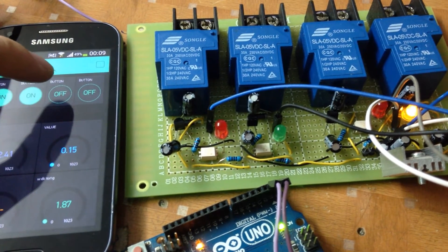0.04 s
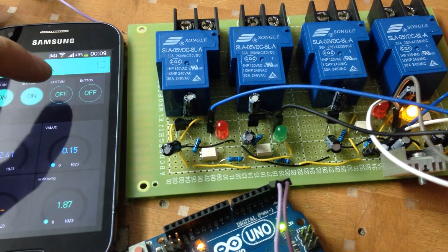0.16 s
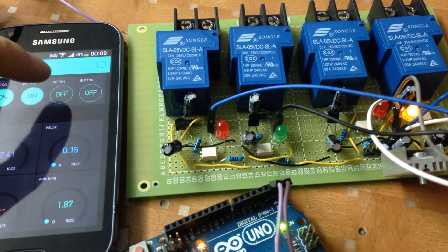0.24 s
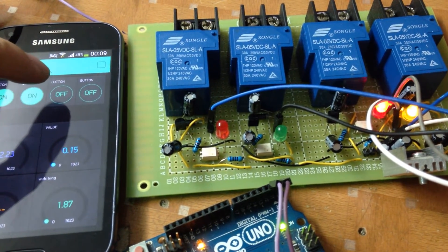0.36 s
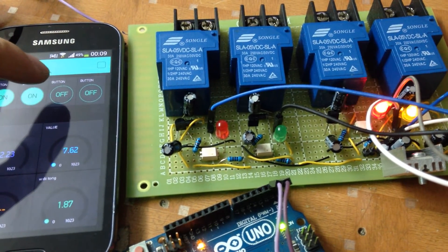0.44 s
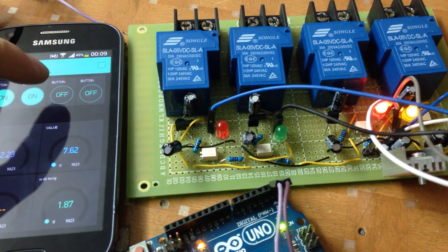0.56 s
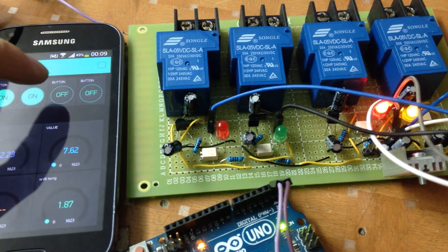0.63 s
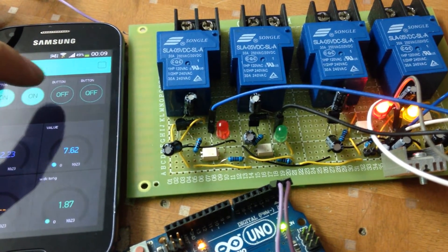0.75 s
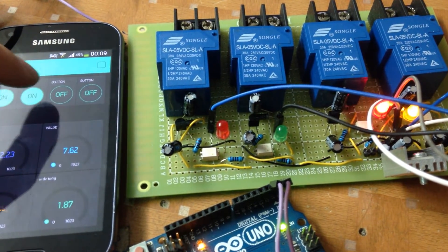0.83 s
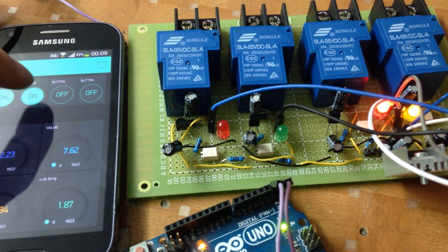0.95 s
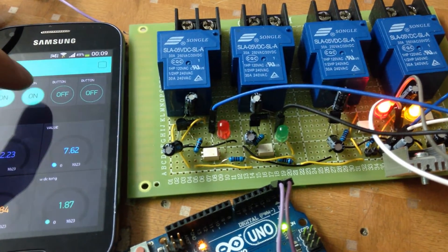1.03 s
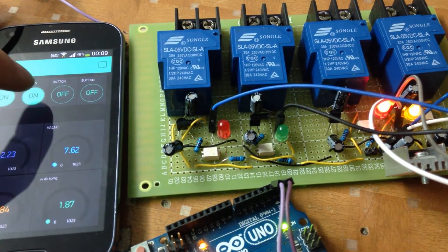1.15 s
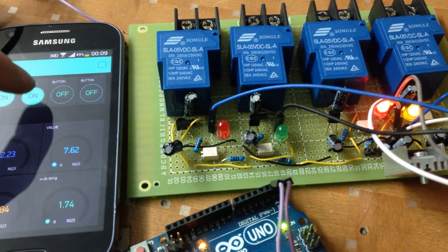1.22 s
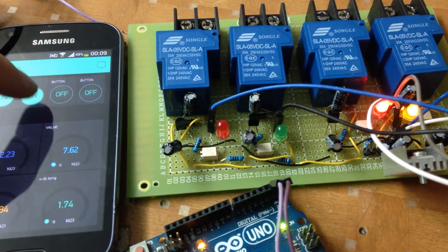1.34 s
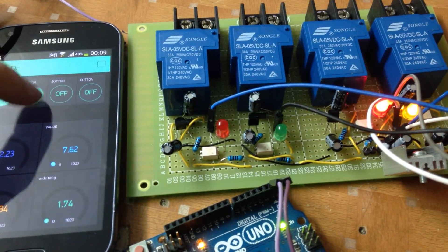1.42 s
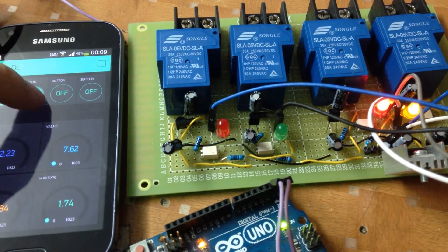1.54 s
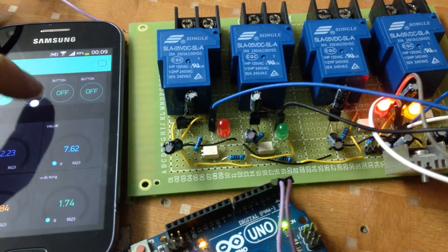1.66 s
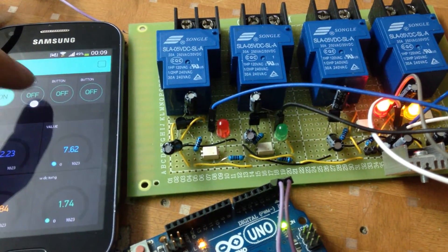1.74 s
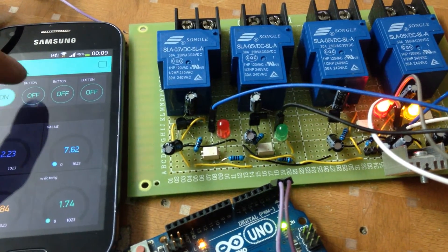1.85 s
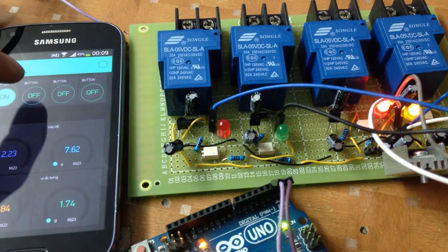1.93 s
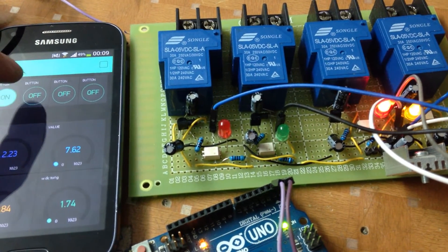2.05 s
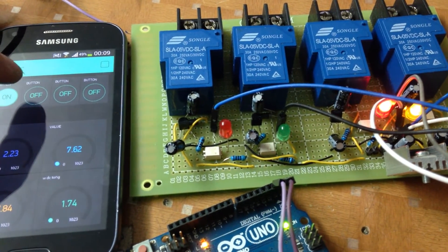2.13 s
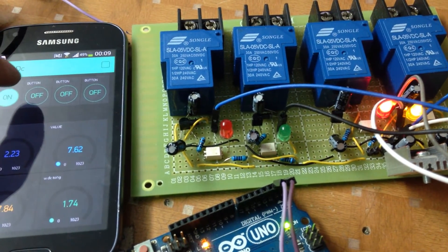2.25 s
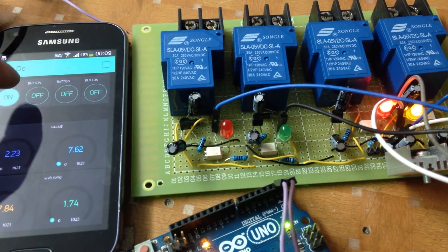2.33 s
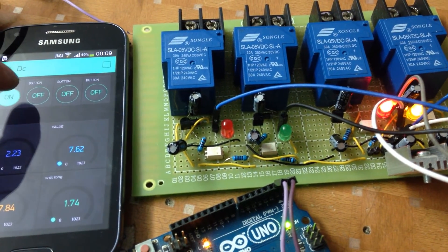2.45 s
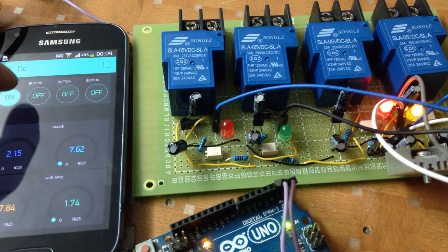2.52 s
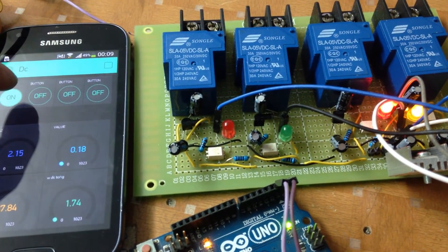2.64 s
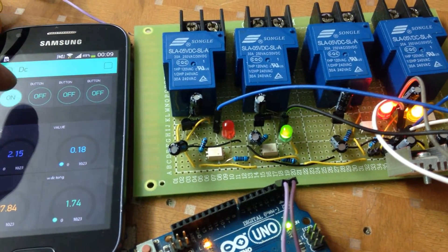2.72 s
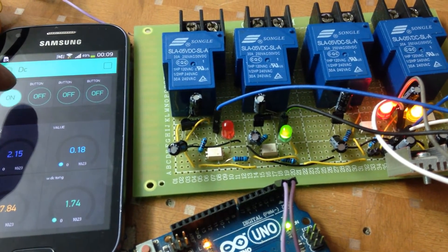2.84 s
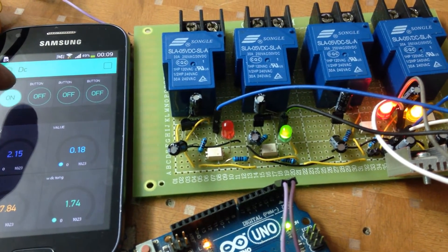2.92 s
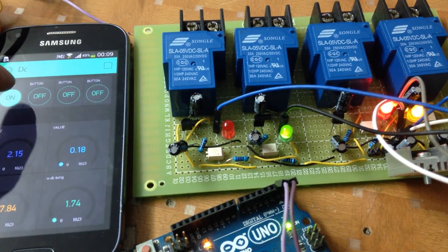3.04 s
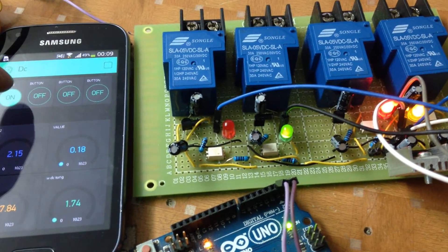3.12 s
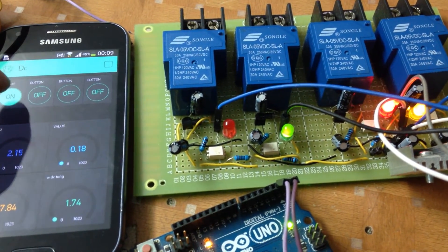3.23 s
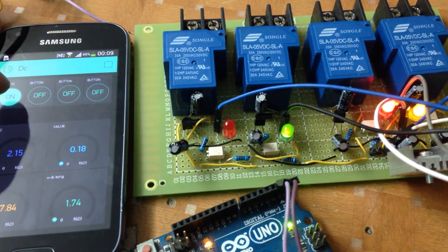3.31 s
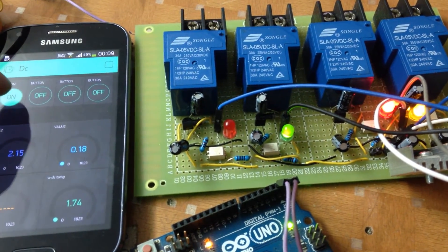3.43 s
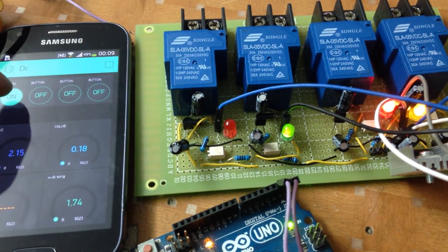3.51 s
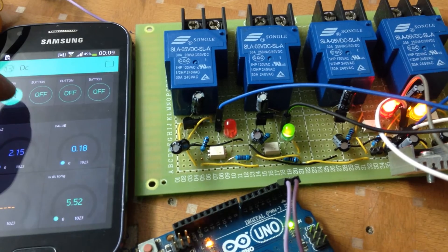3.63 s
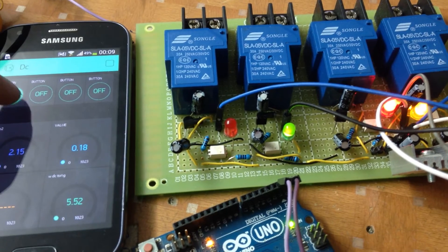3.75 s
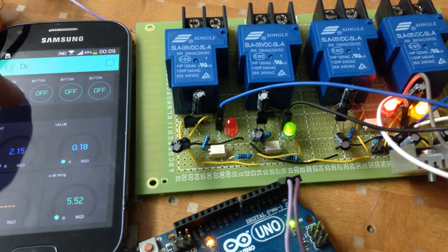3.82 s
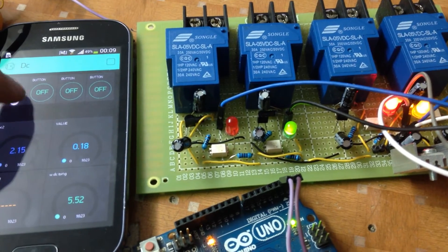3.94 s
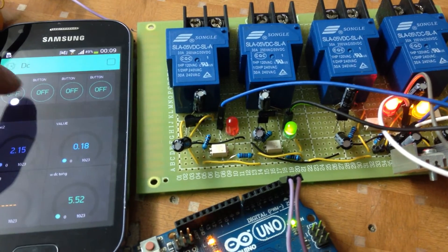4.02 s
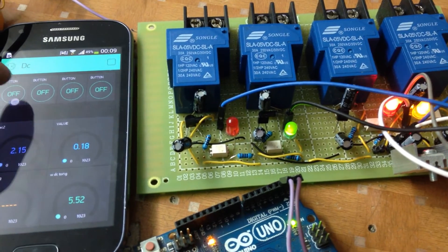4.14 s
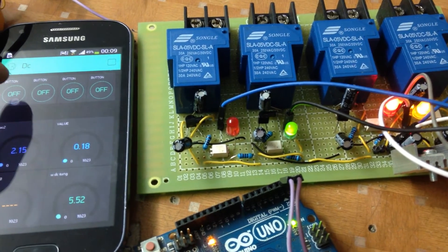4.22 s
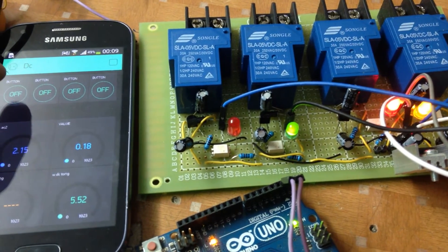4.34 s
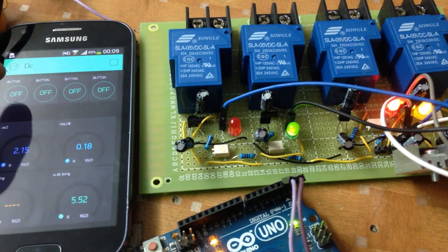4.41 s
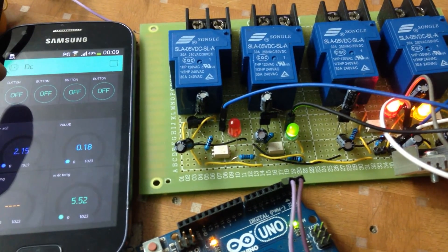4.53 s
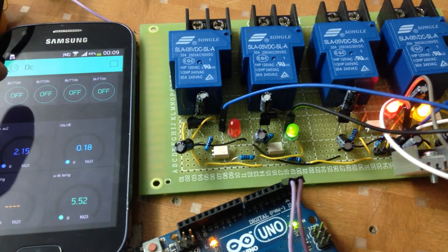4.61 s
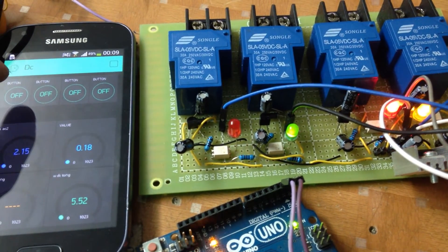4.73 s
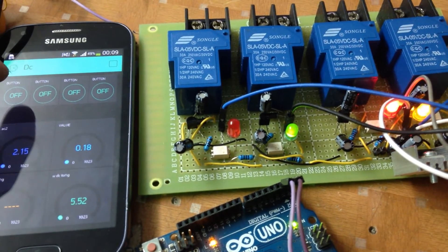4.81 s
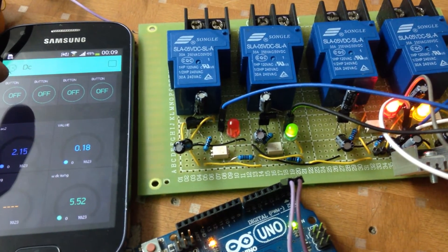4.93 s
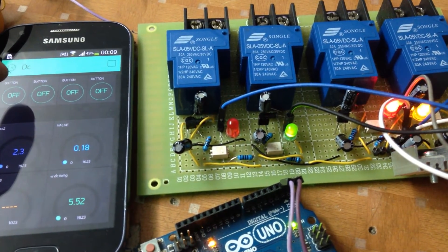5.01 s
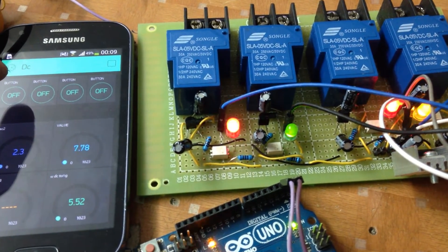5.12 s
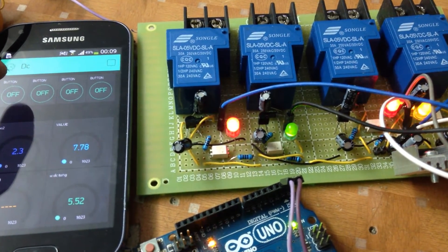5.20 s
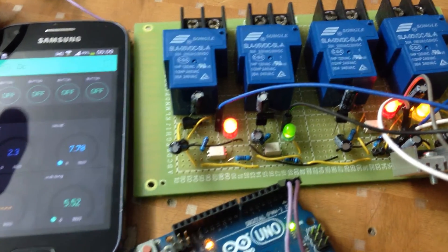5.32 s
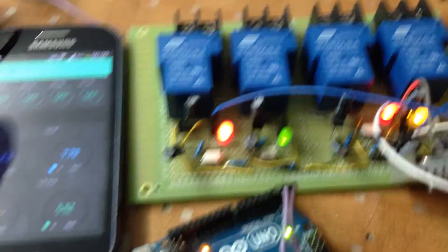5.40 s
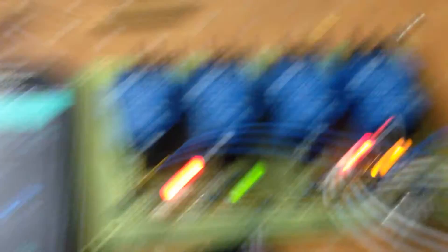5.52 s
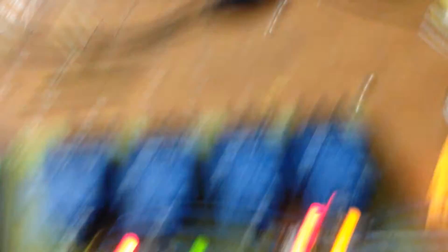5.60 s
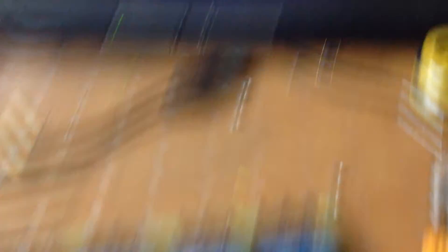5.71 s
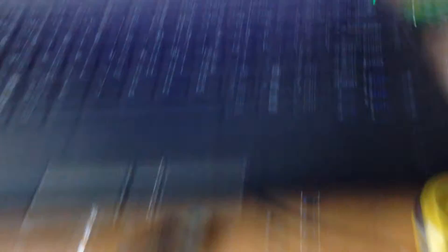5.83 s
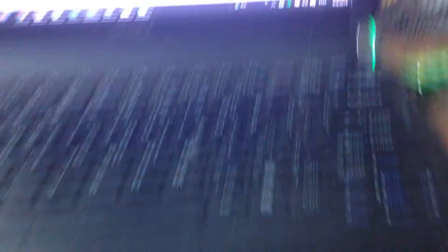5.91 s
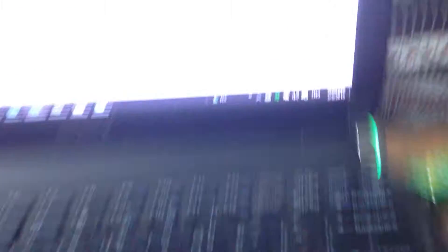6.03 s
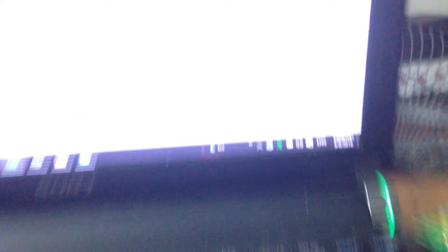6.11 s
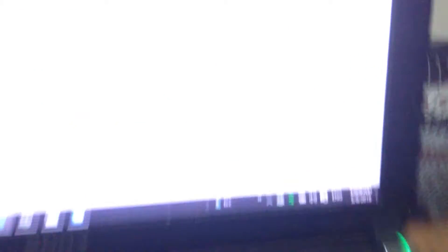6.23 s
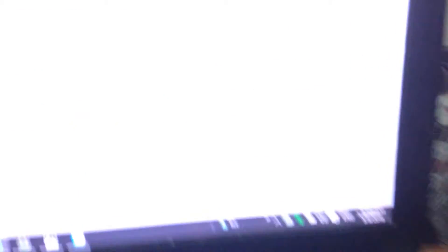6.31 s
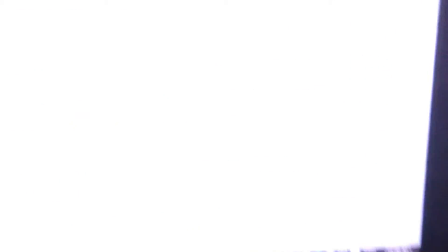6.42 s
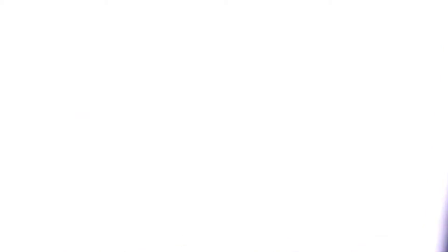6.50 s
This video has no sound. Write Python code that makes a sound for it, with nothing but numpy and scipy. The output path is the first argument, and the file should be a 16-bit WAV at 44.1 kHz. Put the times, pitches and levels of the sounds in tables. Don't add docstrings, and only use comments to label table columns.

```python
import sys
import numpy as np
from scipy import signal
from scipy.fft import rfft, irfft
from scipy.io import wavfile
from scipy.ndimage import uniform_filter1d, minimum_filter1d

SR = 44100
rng = np.random.default_rng(int(sys.argv[2]) if len(sys.argv) > 2 else 0)


def nominal_scale(level):
    x = np.asarray(level, float) / 20
    return 10 ** x


def file_out(sig):
    cols = np.atleast_2d(sig).T
    lim = np.clip(cols, -1, 1)
    pcm = np.round(lim * 32767).astype(np.int16)
    wavfile.write(sys.argv[1], SR, pcm)


N = 289296

# time_s, shaft_hz
FAN_SPEED = [
    (0, 63.205),
    (3.1, 63.205),
    (3.6, 63.24),
    (6.56, 63.24),
]
# shaft_multiple, level_db, fuzz_share
FAN_ORDERS = [(1, -70, 0.85), (2, -63.5, 0.04), (4, -70.5, 0.6), (5, -66, 1), (6, -65, 0.4),
              (7, -68.5, 0.95), (8, -81, 0.4), (9, -68.5, 0.7), (13.5, -68.5, 0.94)]
# pitch_hz, first_throb_s
TRANSFORMER_TONES = [(168.58, .0059), (180.0, .011), (204.93, .0395), (99.6, .003), (232.5, .01)]
TRANSFORMER_DB = [-60.5, -72, -64, -87, -72]
# freq_hz, density_db
AIR_SPECTRUM = [(22, -31), (50, -19), (160, -13.5), (300, -19.5), (450, -19), (720, -22), (870, -18),
                (1000, -20.5), (1750, -16), (2700, -22), (5000, -20.5), (8500, -20.5), (12000, -24.5),
                (15500, -34)]
# time_s, place
MIC_SWAY = [(0, .8), (.4, .4), (.8, -.2), (1.5, .5), (1.85, 0), (2.2, .8), (2.55, .8), (2.8, -.2),
            (3.1, -1.9), (3.5, -.3), (3.95, -1.4), (4.3, .4), (4.6, -.8), (4.9, .1), (5.5, -.9), (5.8, .5),
            (6.2, .3), (6.56, .6)]
# time_s, grip_0_to_1
HAND_GRIP = [
    (0, .35),
    (.4, .8),
    (.6, .05),
    (1.2, 0.2),
    (1.7, 0.55),
    (3.5, 1),
    (5.4, 0.86),
    (5.9, 0.55),
    (6.56, .25),
]
# start_s, pitch_hz, level_db, t60_s
DESK_KNOCKS = [
    (.015, 427, -48, 0.33),
    (.03, 305, -47, .35),
    (0.059, 385, -42, 0.15),
    (3.5, 376, -50, 0.35),
]
# start_s, length_s, level_db
COIL_PULLS = [
    (.4540, 0.001, -41),
    (2.7698, 0.002, -37),
    (5.0975, 0.001, -39),
]
# time_s, blow_db
ARMATURE_BLOWS = [
    [(.4659, -16), (.4663, -10), (.4667, -5), (.4676, -14), (.4690, -14), (.4707, -9)],
    [(2.7830, -14), (2.7833, -9), (2.7836, -5), (2.7845, -10), (2.7858, -14), (2.7865, -14), (2.7884, -20)],
    [(5.1100, -14), (5.1105, -10), (5.1109, -10), (5.1113, -6), (5.1124, -9), (5.1137, -11), (5.1150, -17)],
]
SEATED_TIMES = [.4692, 2.7866, 5.1124]
# pitch_hz, peak_db, build_up_s, fade_db_per_ms
CASE_ONE = [(3720, -38, .0006, 9), (4300, -36, .0007, 8), (4740, -23, .0033, 3), (5300, -27, .0007, 7),
            (5800, -21, .0007, 8), (6200, -19, .0007, 6), (6500, -21, .0007, 8), (6850, -17, .0008, 2.5),
            (8050, -17.5, .0007, 4.5), (8770, -13, .0008, 5.5), (10088, -8.5, .0023, 2.5),
            (11246, -20, .002, 3.5), (10650, -25, .0008, 6), (12000, -26, .0008, 7), (12726, -19, .0012, 6),
            (13100, -27, .0007, 8), (13550, -22, .0007, 8), (14433, -20, .0006, 6), (15980, -30, .0008, 8)]
# pitch_hz, peak_db, build_up_s, fade_db_per_ms
CASE_TWO = [(2266, -42, .001, 1.2), (3200, -33, .0006, 4), (4000, -36, .0007, 2.5), (4667, -32, .002, 1.5),
            (5130, -31, .0014, 3), (5599, -28, .0014, 3), (6788, -15, .0005, 8), (7100, -18, .0005, 7),
            (7499, -14, .0005, 6), (7850, -19, .0005, 6), (8387, -11, .0012, 2.2), (9453, -14, .001, 1.5),
            (9846, -14, .0008, 3.5), (10400, -20, .0005, 8), (11052, -19, .0005, 7), (11827, -23, .0005, 7),
            (12737, -23, .001, 6), (13500, -25, .0005, 6), (14072, -23, .0005, 6), (14550, -26, .0005, 7)]
# pitch_hz, peak_db, build_up_s, fade_db_per_ms
CASE_THREE = [(2692, -43, .001, 3), (3688, -33, .0008, 4), (4075, -35, .0012, 3), (4650, -20, .0012, 5),
              (5400, -28.5, .0006, 6), (5900, -30, .0006, 6), (7150, -19, .0008, 7), (7709, -8.5, .0014, 4),
              (8446, -20, .0012, 3), (9141, -23, .0006, 2.2), (9803, -15, .001, 4), (10654, -16, .0014, 6),
              (11400, -19, .0013, 7), (11897, -15, .0013, 7), (12500, -19, .0015, 7), (13168, -20, .001, 5),
              (13700, -22, .0008, 7), (14287, -19, .0005, 8), (15830, -32, .001, 7)]
# pitch_hz, width_hz, level_db, t60_s
SPRING_RINGS = [
    [(4700, 200, -33, 0.2), (6100, 300, -33, 0.097), (7440, 900, -35, 0.11), (8800, 1200, -33, .1),
     (10070, 800, -33, 0.15), (11200, 200, -37, 0.14), (12200, 400, -38, 0.1), (12900, 400, -36, .1),
     (14500, 700, -44, .1)],
    [(4640, 210, -37, 0.12), (5900, 2300, -28.5, 0.087), (8420, 700, -30.5, 0.2), (9900, 1100, -35, .15),
     (11500, 500, -38, 0.15), (12300, 500, -36, .12), (14000, 600, -46, .09)],
    [(4620, 280, -32, 0.11), (7650, 600, -32, .15), (8900, 600, -30, 0.14), (10107, 1100, -35, 0.17),
     (11800, 800, -35, .15), (12800, 400, -34, 0.16), (14700, 700, -43, .1)],
]
# freq_hz, level_db
CONTACT_CRACK = [
    [(500, -50), (1500, -38), (2500, -33), (3500, -35), (6000, -16), (10000, -14), (14000, -19),
     (15300, -30), (16500, -20)],
    [(500, -66), (1500, -62), (2800, -54), (3300, -38), (6000, -24), (10000, -15), (14500, -21),
     (15300, -44), (16500, -60)],
    [(500, -56), (1500, -39), (2800, -34), (3500, -33), (6000, -20), (10000, -14), (13000, -16),
     (15500, -30), (16500, -26)],
]
# freq_hz, t60_s
DESK_TAIL = [(2000, 0.069), (5000, 0.32), (9000, 0.25), (15000, 0.34)]
# start_s, length_s, swaps_per_s
HISS_SWAPS = [
    (.1, .1, 10),
    (.9, .1, 10),
    (1.36, .4, 30),
    (2.2, .46, 11),
    (3.08, .6, 12),
    (4.29, .55, 20),
    (5.68, .76, 7),
]


def evened(x):
    return x / np.sqrt(np.mean(x ** 2) + 1e-20)


def read(points, hz):
    f, value = np.transpose(points)
    return np.interp(np.log(hz + 1), np.log(f + 1), value)


def track(points, t):
    return np.interp(t, *np.transpose(points))


def resonate(x, hz, width_hz):
    turn = np.exp(2j * np.pi * np.cumsum(hz * np.ones(len(x))) / SR)
    r = np.exp(-np.pi * width_hz / SR)
    return 2 * (turn * signal.lfilter([1 - r], [1, -r], x / turn)).real


def causal(points, size=256):
    log_gain = np.log(nominal_scale(read(points, abs(np.fft.fftfreq(2048, 1 / SR)))))
    return np.fft.ifft(np.exp(np.conj(signal.hilbert(log_gain)))).real[:size]


def bump(hz, mid_hz, octaves):
    return np.exp(-.5 * (np.log2((hz + 1) / mid_hz) / octaves) ** 2)[:, None]


def turned(t):
    start_s, length_s = 5.3, 0.83
    return np.clip((t - start_s) / length_s, 0, 1)


def hum():
    main_hz, blade_throb_s = 199.11, .0169
    t = np.arange(N) / SR
    shaft_hz = track(FAN_SPEED, t)
    turns, main = np.cumsum(shaft_hz) / SR, rng.random()
    sway, grip = track(MIC_SWAY, t), track(HAND_GRIP, t)
    blade_db, main_db = -57 + 4.5 * sway, -54 - 2 * sway
    low_db, high_db = -8 + 9 * grip, -4.5 + 5.5 * grip

    out = nominal_scale(main_db) * np.sin(2 * np.pi * (main_hz * t + main))
    blade_start = main + (main_hz - 3 * shaft_hz[0]) * blade_throb_s
    out += nominal_scale(blade_db) * np.sin(2 * np.pi * (3 * turns + blade_start))
    for (hz, throb_s), db in zip(TRANSFORMER_TONES, TRANSFORMER_DB):
        phase = hz * t + main + (main_hz - hz) * throb_s
        out += nominal_scale(db + high_db) * np.sin(2 * np.pi * phase)
    for k, db, fuzz in FAN_ORDERS:
        clean = np.sin(2 * np.pi * (k * turns + rng.random()))
        width_hz = .12 * k ** 2 + 1
        fuzzy = evened(resonate(rng.standard_normal(N), k * shaft_hz, width_hz)) / np.sqrt(2)
        order_db = db + (low_db if k < 3 else high_db)
        out += nominal_scale(order_db) * (np.sqrt(1 - fuzz) * clean + np.sqrt(fuzz) * fuzzy)
    return np.sqrt(2) * out


def air():
    frames, hz = N // 256 + 5, np.fft.rfftfreq(1024, 1 / SR)
    a, b, patches = rng.standard_normal((frames, 513, 3)).T
    noise = a + 1j * b
    patches = evened(uniform_filter1d(uniform_filter1d(patches, size=12, axis=0), size=14, axis=1))
    t = np.arange(frames) * 256 / SR
    grip, turn = track(HAND_GRIP, t), turned(t)

    field_db = read(AIR_SPECTRUM, hz)[:, None] + 1.24 * patches
    plain = signal.istft(noise * nominal_scale(field_db), nperseg=1024, noverlap=768)[1]
    level = np.sqrt(np.mean(plain ** 2))

    hiss_db = -46.5 + 1.5 * turn
    rumble_db = -16.5 + 20 * grip
    stir_db = 8.5 * np.exp(-(t / .19) ** 2)
    mids_db = -0.1 + 2 * grip - 1.5 * turn + stir_db
    outlet_db = -0.54 + 1.1 * turn
    facing_db = 2.5 * np.clip((t - 6.2) / .15, 0, 1)
    field_db = field_db + hiss_db + rumble_db * bump(hz, 80, 0.62)
    field_db = field_db + mids_db * bump(hz, 370, 0.61) + outlet_db * bump(hz, 1200, 0.081)
    field_db = field_db + facing_db * (bump(hz, 1430, .12) - bump(hz, 2100, .2))
    return signal.istft(noise * nominal_scale(field_db), nperseg=1024, noverlap=768)[1][:N] / level


def knock():
    out = np.zeros(N)
    for start_s, hz, db, t60 in DESK_KNOCKS:
        t = np.maximum(np.arange(N) / SR - start_s, 0)
        out += nominal_scale(db - 60 * t / t60) * (1 - np.exp(-t / 0.0065)) * np.sin(2 * np.pi * hz * t)
    return out


def case_modes(case, t):
    out = np.zeros(len(t))
    for k, (hz, db, rise_s, fade) in enumerate(case):
        level_db = 5 + db - fade * np.maximum(1000 * (t - rise_s), 0)
        rise = np.minimum(t / max(rise_s, 1e-4), 1)
        out += nominal_scale(level_db) * rise * np.sin(2 * np.pi * (hz * t + k / 2 + .2 * rng.random()))
    return out


def relay(blows, seated_s, pull, case, rings, contact):
    pull_s, pull_length_s, pull_db = pull
    start, size = round((pull_s - .01) * SR), 12000
    t = np.arange(size) / SR
    touch_s = blows[0][0]
    since = np.maximum(t + start / SR - touch_s, 0)
    drive = np.zeros(size)
    for s, db in blows:
        drive[round(s * SR) - start] += nominal_scale(db) * rng.choice([-1., 1.])

    modes = case_modes(case, t)
    jolt = modes * nominal_scale(-4000 * t)
    creep_gate = np.clip(np.minimum(t - .01, 0.013 + pull_length_s - t) / .0006, 0, 1)
    creep = rng.standard_normal(size) * creep_gate
    tick = signal.fftconvolve(creep, jolt[:400])[:size]
    tick *= nominal_scale(pull_db) / np.sqrt(np.sum(tick ** 2) / (pull_length_s * SR))

    held = nominal_scale(-12000 * np.maximum(t + start / SR - seated_s, 0))
    slam = np.roll(modes, round(touch_s * SR) - start) * held
    rebound = nominal_scale(-3) * signal.fftconvolve(drive * (since > .0015), jolt)[:size]
    crack = signal.fftconvolve(drive, nominal_scale(22) * causal(contact))[:size]

    shiver = np.zeros(size)
    for hz, width_hz, db, t60 in rings:
        cluster = resonate(resonate(rng.standard_normal(size), hz, width_hz), hz, 4 * width_hz)
        shiver += nominal_scale(db - 60 * since / t60) * evened(cluster)
    shiver *= 1 - np.exp(-since / 0.0012)
    return start, slam + rebound + crack + tick + shiver


def desk(x):
    taps = np.zeros(12000)
    at = np.arange(200, 11980, 20) + rng.integers(0, 20, 589)
    taps[at] = rng.choice([-1., 1.], len(at))
    hz, t, z = signal.stft(taps, SR, nperseg=128)
    tail = signal.istft(z * nominal_scale(-60 * t / read(DESK_TAIL, hz)[:, None]), SR, nperseg=128)[1]
    return signal.fftconvolve(x, tail / np.linalg.norm(tail))[:N]


def scene():
    clicks = np.zeros(N)
    cases = (CASE_ONE, CASE_TWO, CASE_THREE)
    for parts in zip(ARMATURE_BLOWS, SEATED_TIMES, COIL_PULLS, cases, SPRING_RINGS, CONTACT_CRACK):
        start, sound = relay(*parts)
        clicks[start:start + len(sound)] += sound
    return np.tile(hum() + air() + knock() + clicks + nominal_scale(-18.5) * desk(clicks), (2, 1))


def thinned(x):
    bins, n = np.arange(400, 800) + .5, np.arange(2048) + .5
    basis = np.cos(np.pi / 1024 * np.outer(bins, n + 512)) * np.sin(np.pi * n / 2048) / np.sqrt(512)
    starts = np.arange(158, N - 2048, 1024)
    frames = starts[:, None] + np.arange(2048)
    lines, hz = x[frames] @ basis.T, bins * SR / 2048
    patch = uniform_filter1d(uniform_filter1d(lines ** 2, size=6, axis=1), size=2, axis=0)
    band = uniform_filter1d(uniform_filter1d(lines ** 2, size=48, axis=1), size=2, axis=0)
    t = starts / SR
    share = (.7 - .066 * t + .27 * turned(t))[:, None] * np.clip((hz - 8000) / 6000, 0, 1)
    strong = minimum_filter1d(1. * (patch > share * band), size=3, axis=1)
    steady = abs(x[frames]).max(1, keepdims=True) < nominal_scale(-26)
    out = x.copy()
    np.add.at(out, frames, (lines * (strong * (hz < 15340) - 1) * steady) @ basis)
    return out


def swapped(x):
    out, hz = x.copy(), np.fft.rfftfreq(2048, 1 / SR)
    window = signal.windows.kaiser_bessel_derived(2048, 4 * np.pi)
    lowest_hz, highest_hz, width_hz = 4200, 13500, 1500
    for start_s, length_s, rate in HISS_SWAPS:
        count = round(length_s * rate)
        for k, (late, place, wide) in enumerate(rng.random((count, 3))):
            at = 158 + 1024 * round((start_s + length_s * (k + late) / count) * SR / 1024)
            frame = slice(at - 1024, at + 1024)
            lo_hz = lowest_hz + (highest_hz - lowest_hz) * place ** 1.4
            inside = (hz > lo_hz) & (hz < lo_hz + width_hz * (.65 + .7 * wide))
            band = irfft(rfft(x[:, frame]) * inside)
            fresh = irfft(rfft(rng.standard_normal((2, 2048))) * inside)
            out[:, frame] += window * evened(fresh) * np.std(band) - window ** 2 * band
    return out


def gain_db(x):
    tripped = np.diff(1. * (uniform_filter1d(x ** 2, size=400) > nominal_scale(-50)), prepend=0) > 0
    quick, back, fall = (np.exp(-1 / (s * SR)) for s in (.07, .88, .015))
    dip_db = signal.lfilter([8.2], [1, -back], tripped) + signal.lfilter([3.], [1, -quick], tripped)
    return signal.lfilter([1 - fall], [1, -fall], dip_db)


def band_limited(x):
    low_edge = signal.firwin(511, 15330, window=("kaiser", 6), fs=SR)[None]
    high_edge = signal.firwin(255, 16450, window=("kaiser", 4.5), fs=SR)[None]
    edged = signal.oaconvolve(x, low_edge, "same")
    wider = signal.oaconvolve(x, high_edge, "same")
    clicking = uniform_filter1d(1. * (uniform_filter1d(x ** 2, size=120) > nominal_scale(-40)), size=60)
    edged += nominal_scale(-12) * clicking * (wider - edged)
    return signal.sosfilt(signal.butter(2, 34, "high", fs=SR, output="sos"), edged[0])


def top_cut(x):
    return signal.sosfilt(signal.butter(12, 16500, fs=SR, output="sos"), x)


def record(dry):
    ceiling = .85
    limited = ceiling * np.tanh(dry / nominal_scale(gain_db(dry[0])) / ceiling)
    limited += nominal_scale(-69) * evened(np.diff(rng.standard_normal(N + 2), 2))
    mono = thinned(band_limited(limited))
    mix = swapped(np.tile(mono, (2, 1)))
    return top_cut(mix)


dry = scene()
out = record(dry)
file_out(out)
```